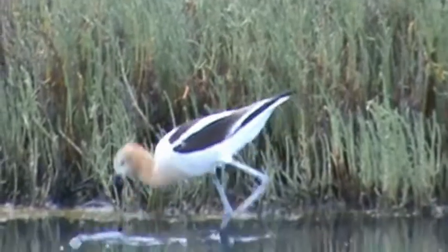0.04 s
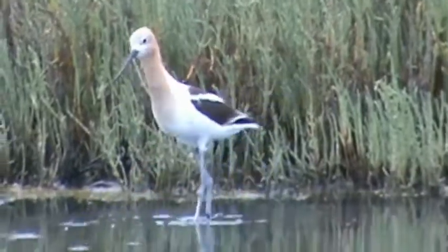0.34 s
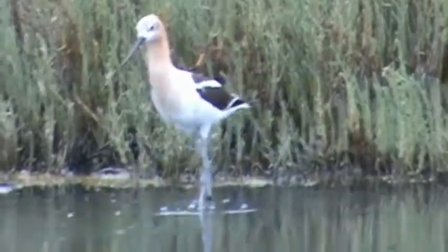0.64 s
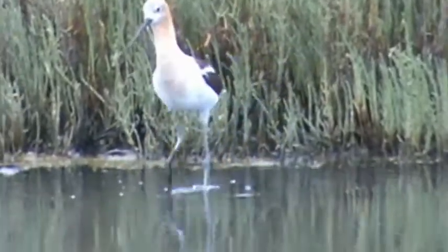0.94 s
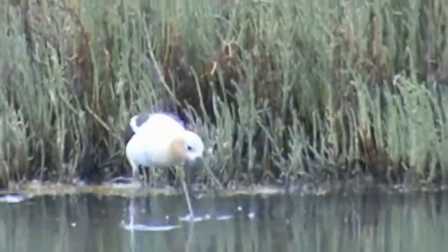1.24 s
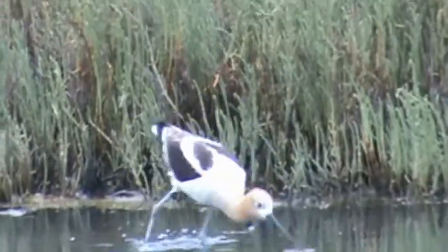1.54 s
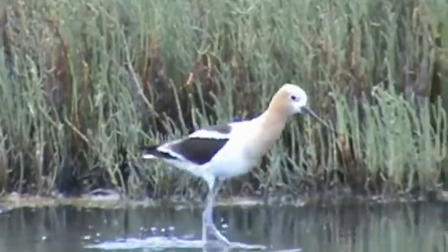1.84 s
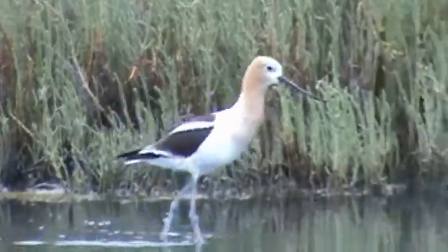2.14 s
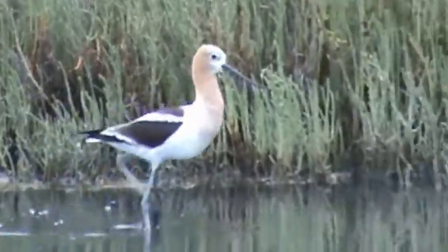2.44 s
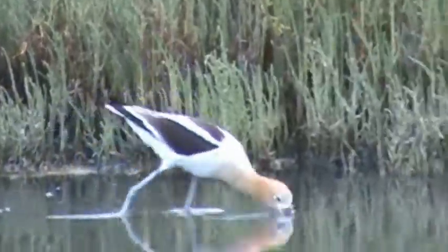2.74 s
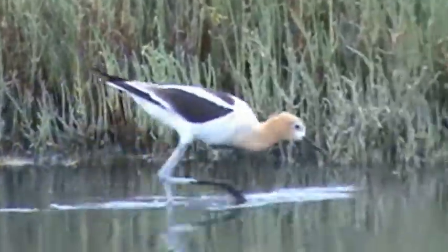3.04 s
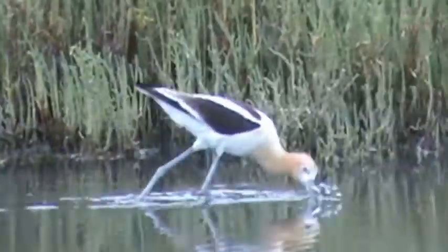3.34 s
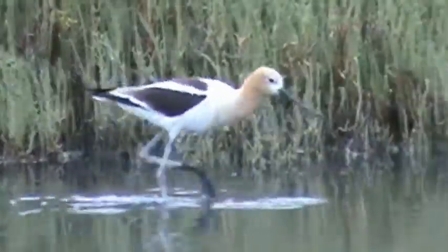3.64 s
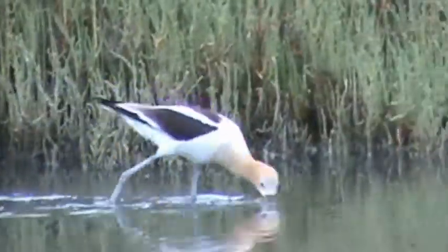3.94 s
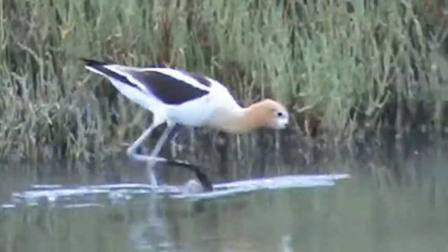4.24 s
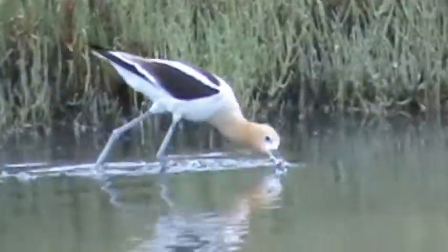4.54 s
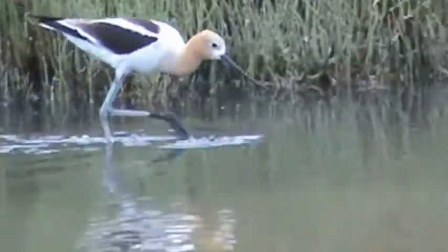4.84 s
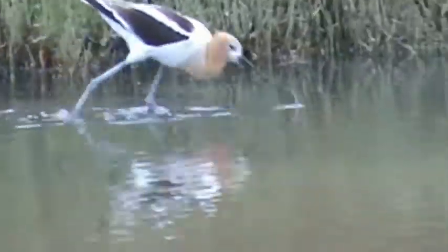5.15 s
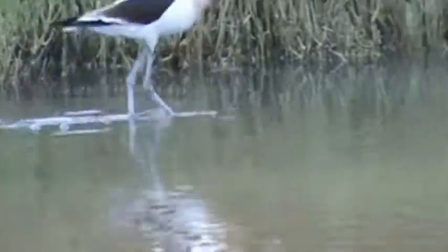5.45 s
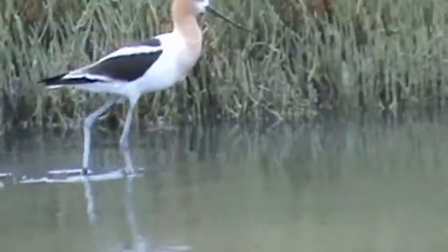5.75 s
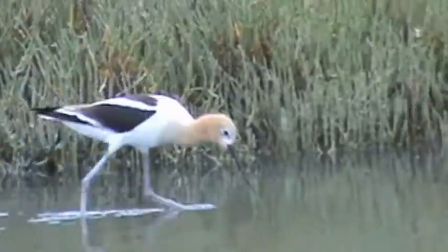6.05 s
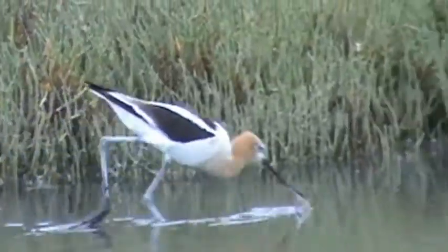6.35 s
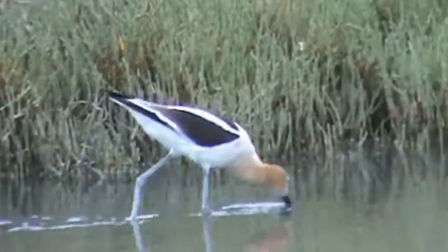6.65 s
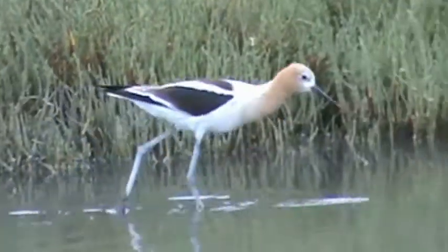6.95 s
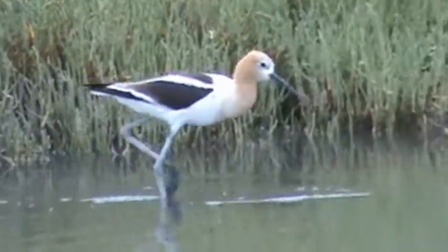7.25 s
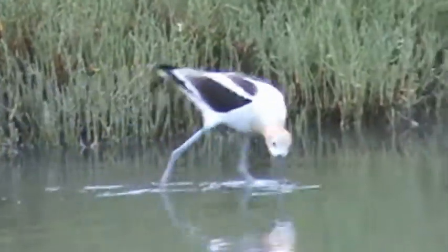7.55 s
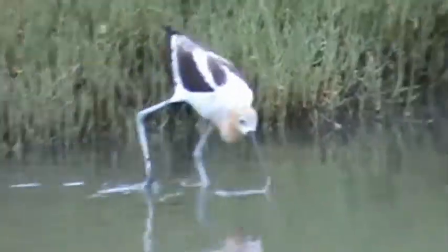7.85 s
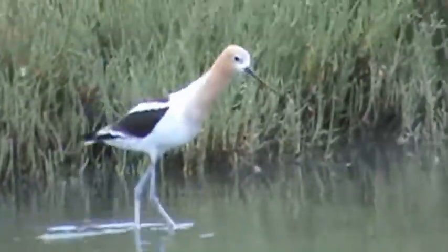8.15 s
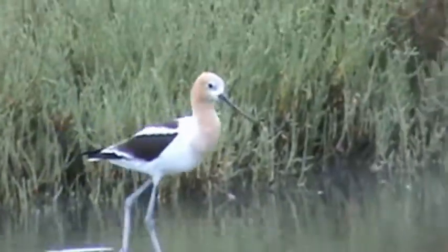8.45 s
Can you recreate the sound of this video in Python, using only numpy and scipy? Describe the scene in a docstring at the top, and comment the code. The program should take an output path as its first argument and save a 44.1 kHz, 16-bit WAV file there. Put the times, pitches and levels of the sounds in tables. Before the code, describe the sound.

Faint, distant birds whistle over a low rumble and soft hiss in an open marsh. Then a nearby wading bird gives five sharp, high calls, each a tiny croak jumping into a loud, falling whistle with a light echo. One sharp click sounds close to the microphone, and three more calls follow, a second bird overlapping one of them. A cricket chirps faintly throughout.

```python
"""Avocets over a shallow marsh

Each call climbs through three registers of the syrinx: a reedy croak, a brief yelp and a loud arched whistle
that falls away. Reeds scatter it and the far bank echoes it. The echo of an earlier call fades at the start,
other birds answer faintly, a cricket chirps in double wing strokes and a few ticks sound close by, over a
distant rumble, a hum and soft hiss. An automatic gain control ducks at the loudest peaks and recovers slowly."""
import sys
import numpy as np
from scipy import signal
from scipy.fft import rfft, irfft, next_fast_len
from scipy.io import wavfile
from scipy.ndimage import uniform_filter1d, minimum_filter1d, map_coordinates

SR = 44100
rng = np.random.default_rng(int(sys.argv[2]) if len(sys.argv) > 2 else 0)


def waveform_to_disk(signal):
    """Save audio, clipped to [-1, 1], as 16-bit WAV at the path in sys.argv[1]."""
    frames = np.transpose(np.atleast_2d(signal))
    scaled = np.clip(frames, -1, 1) * 32767
    samples = np.round(scaled).astype(np.int16)
    wavfile.write(sys.argv[1], SR, samples)


N = 379246

# spectra of the distant rumble and the open-air wash: (frequency [Hz], relative density [dB])
RUMBLE_SPECTRUM = [(12, -35), (20, -16), (38, -3.5), (60, 2), (123, 0), (171, -3.5), (211, -7),
                   (357, -14.5), (400, -17), (520, -40), (880, -120)]
WASH_SPECTRUM = [(150, -15.5), (250, -5.5), (366, -4), (471, -3), (526, -6), (807, 0), (1070, -2),
                 (1590, -2.5), (2120, -7), (2910, -12.5), (3630, -13.5), (3990, -11.5), (5390, -16),
                 (10500, -19.5), (11000, -26), (14300, -72), (22000, -120)]
# envelopes of the rumble, the wash and a far hum: (time [s], relative level [dB])
RUMBLE_ENVELOPE = [(0, -37), (.14, -41), (.26, -34), (.56, -41), (1.4, -40), (2.7, -40.5), (5.9, -41),
                   (7.7, -43), (8.6, -42.5)]
WASH_ENVELOPE = [(0, -47.5), (.5, -46.5), (2.1, -45.5), (4.2, -46.5), (4.9, -45), (5.15, -47.5), (7.2, -46),
                 (7.9, -48), (8.6, -46)]
HUM_ENVELOPE = [(.15, -58), (.35, -46.5), (.65, -41.5), (.95, -49), (1.25, -48.5), (1.5, -58)]
# likeness of the air's noise at left and right: (frequency [Hz], correlation [0-1])
AIR_COHERENCE = [(60, 1), (140, 1), (340, 0.82), (820, 0.76), (1960, 0.64), (4690, 0.81), (11200, 1)]
# swells of high hiss: (middle time [s], duration [s], centre [Hz], bandwidth [Hz], level [dB])
HISS_SWELLS = [(.31, .45, 3940, 1600, -45.5), (3.98, 0.55, 8000, 5000, -45.5),
               (4.862, .5, 4300, 1200, -46.5), (6.499, .55, 7200, 6500, -50), (7.3, .45, 4300, 1400, -46.5)]
# the cricket's runs of chirps: (first chirp [s], last chirp [s], relative level [dB])
CHIRP_RUNS = [(0.402, 1.196, -46), (1.384, 2.263, -45.5), (2.67, 2.866, -46), (3.274, 4.925, -45.5),
              (5.365, 6.388, -45), (6.542, 7.171, -43.5), (7.35, 7.529, -43.5), (8.005, 8.566, -46)]
# distant whistles, the first being the fading echo of an earlier call: (time [s], duration [s], top pitch [Hz],
# relative level [dB])
FAR_WHISTLES = [(.01, 0.18, 3393, -44), (0.578, 0.061, 3540, -45), (0.856, 0.069, 3305, -45),
                (0.859, .06, 4250, -53), (1.157, 0.11, 3250, -49.5), (1.328, 0.041, 3490, -49),
                (1.61, 0.062, 4460, -50), (5.31, 0.067, 3430, -51)]
# small dry ticks: (time [s], relative peak [dB], centre [Hz], bandwidth [Hz])
DRY_TICKS = [(0.024, -32.5, 6970, 3000), (1.375, -35, 8850, 3000), (1.404, -27, 5400, 5000),
             (5.465, -31, 3272, 889)]
# one sharp click: (time [s], relative peak [dB])
SHARP_CLICK = [(4.984, -3.5)]
# spectrum of that click: (frequency [Hz], relative density [dB])
CLICK_SPECTRUM = [(180, -48), (300, -33), (875, -6), (2550, -10.5), (3200, 5.5), (3830, -14), (4390, -3.5),
                  (6200, -6), (6690, -4), (7660, -0.5), (11000, -2.5), (14300, -41), (22000, -120)]
# envelope of the marsh's impulse response: (delay [s], relative level [dB])
ECHO_ENVELOPE = [(.004, 17), (0.032, 0.5), (.07, -6.5), (.14, -21), (.18, -8), (.225, -6.5), (.27, -13.5),
                 (.4, -21), (.6, -35)]
# frequency responses of the marsh and of the bird's throat: (frequency [Hz], gain [dB])
ECHO_RESPONSE = [(700, 9.5), (2500, -1.5), (3300, 1), (5000, 1), (6600, 6.5), (10000, -5)]
THROAT_RESPONSE = [(520, -2.5), (680, 1), (880, -6), (1250, -27), (1700, -5.5), (2400, 5.5), (3800, 2.5),
                   (4700, -11), (5800, -14), (6800, -25.5), (10000, -33)]
# direction of the near calls: (time [s], left minus right [dB])
CALL_BEARING = [(2.5, -2.7), (3.13, -5.3), (4.04, -6.2), (6.1, -3.1), (7.81, -3.9)]
# the croak that opens a call, with levels ahead of the throat:
# (time [s], duration [s], first pitch [Hz], last pitch [Hz], fundamental [dB], overtones [dB])
CROAK_NOTES = [(2.022, 0.047, 505, 571, -41, -35.5), (2.412, 0.021, 580, 619, -39, -25),
               (3.013, 0.069, 520, 670, -38, -42), (3.474, .061, 560, 701, -37, -40),
               (3.938, 0.058, 612, 760, -35, -35), (6.032, .05, 685, 843, -29.5, -29.5),
               (7.263, 0.06, 560, 806, -32.5, -31), (7.729, 0.052, 660, 905, -33.5, -40.5)]
# short held notes on the way up: (time [s], duration [s], pitch [Hz], pitch slope [ratio], level [dB],
# level slope [dB], octave [dB re tone], third harmonic [dB re tone], growl [0-1])
YELP_NOTES = [(2.058, 0.017, 2770, 0.037, -4.5, 0, -29.5, -30.5, 0.02),
              (2.424, .011, 2285, .01, -13.5, -1, -9.5, -26, 0.12),
              (2.433, .031, 3185, .012, -2.8, -4, -22.5, -20.5, .02),
              (6.063, .019, 2520, 0.024, -14.5, 2, -5.5, -32, 0.16),
              (7.306, 0.021, 2414, 0.061, -16, -5.5, -6, -21.5, 0.09),
              (7.775, 0.024, 2650, -0.031, -16, -2, -19.5, -35, 0.04)]
# arched whistles; two birds overlap at 7.32 s: (time [s], duration [s], pitch [Hz], pitch slope [ratio],
# final fall [ratio], level [dB], level slope [dB], octave [dB re tone], third harmonic [dB re tone])
WHISTLE_NOTES = [(2.079, 0.057, 3420, -0.0052, 0.19, -6, 2, -17, -23),
                 (2.463, .033, 3705, -0.084, 0.36, -3, -5.5, -14, -38),
                 (3.081, 0.097, 3128, -.008, .19, -11.5, 4, -15.5, -35),
                 (3.534, .092, 3182, -0.018, .155, -13.5, 6.5, -13.5, -37),
                 (3.997, 0.086, 3292, -0.024, 0.17, -9, 4.5, -13.5, -34.5),
                 (6.082, 0.058, 3314, -0.15, 0.12, -6.5, 1.5, -14.5, -34.5),
                 (7.323, 0.11, 3211, -.03, 0.12, -13, 3.5, -21.5, -36),
                 (7.326, 0.047, 3464, -.04, 0.16, -8.5, 2, -13.5, -32),
                 (7.798, 0.059, 3285, -.19, 0.1, -14.5, 0, -11, -43)]


def amp(db):
    """Amplitude ratio: tenfold for every 20 dB."""
    return 10 ** (np.asarray(db) / 20)


def unit_rms(x):
    """Normalisation to a mean power of 1."""
    return x / np.sqrt(np.mean(x ** 2) + 1e-20)


def at_frequency(points, hz):
    """Interpolation of (frequency, value) points on a logarithmic axis."""
    knots_hz, values = np.transpose(points)
    return np.interp(np.log(hz + 1), np.log(knots_hz + 1), values)


def envelope(points):
    """Linear interpolation of (time, value) points at every sample."""
    return np.interp(np.arange(N) / SR, *np.transpose(points))


def wobble(rate, size=N):
    """Smooth random modulation: a spline through rate knots a second."""
    knots = rng.standard_normal(int(size * rate / SR) + 4)
    return map_coordinates(knots, [np.arange(size) * rate / SR])


def filtered(x, response):
    """Linear filtering: the spectrum is multiplied by a frequency response."""
    size = next_fast_len(x.shape[-1] + SR // 4)
    return irfft(rfft(x, size) * response(np.fft.rfftfreq(size, 1 / SR)), size)[..., :x.shape[-1]]


def add(track, start, sound):
    """Superposition of a sound on the track from start seconds."""
    part = track[max(round(start * SR), 0):][:len(sound)]
    part += sound[:len(part)]


def panned(x, left_db):
    """Direction by level difference: the left exceeds the right by left_db."""
    gains = amp(np.array([[.5], [-.5]]) * left_db)
    return x * gains / gains.mean(axis=0)


def note_window(length, fade):
    """Raised-cosine gating: returns time, the fraction u of the note gone by, and the gate."""
    t = np.arange(int((length + 2 * fade) * SR)) / SR - fade
    gate = np.sin(np.pi / 2 * np.clip(.5 + np.minimum(t, length - t) / fade, 0, 1)) ** 2
    return t + fade, np.clip(t / length, 0, 1), gate


def diffuse_noise(spectrum, patchy_db):
    """Partly coherent stereo noise: the balance of mid and side sets the correlation."""
    cells = signal.stft(rng.standard_normal((2, N)), nperseg=512)[2]
    # the gain varies in patches of frequency and time
    patches = uniform_filter1d(rng.standard_normal(cells.shape[1:]), size=6, axis=0)
    patches = uniform_filter1d(patches, size=16, axis=1)
    pair = signal.istft(cells * amp(patchy_db * unit_rms(patches)), nperseg=512)[1][:, :N]

    def mid_side(hz):
        angle = np.arccos(np.clip(at_frequency(AIR_COHERENCE, hz), -1, .98)) / 2
        return amp(at_frequency(spectrum, hz)) * [np.cos(angle), np.sin(angle)]

    mid, side = filtered(pair, mid_side)
    return unit_rms(np.array([mid + side, mid - side]))


def open_air(hum_hz):
    """Ambient sound: a low rumble and a broad wash superpose on a far hum that swells and fades."""
    rumble = amp(envelope(RUMBLE_ENVELOPE) + 0.5) * diffuse_noise(RUMBLE_SPECTRUM, patchy_db=0.68)
    wash = amp(envelope(WASH_ENVELOPE) + 6) * diffuse_noise(WASH_SPECTRUM, patchy_db=1.7)
    phase = 2 * np.pi * np.cumsum(hum_hz * (1 + 0.0025 * wobble(13))) / SR
    hum = amp(envelope(HUM_ENVELOPE) + 1.2 * wobble(7.5)) * np.sin(phase)
    return rumble + panned(wash, left_db=0.9) + hum


def hiss_swells():
    """Band-pass noise swells and fades under a half-sine envelope."""
    track = np.zeros(N)
    for middle, length, hz, width, db in HISS_SWELLS:
        u = np.linspace(0, 1, int(length * SR))
        hiss = filtered(rng.standard_normal(len(u)), lambda f: 1 / (1 + (2 * (f - hz) / width) ** 4))
        add(track, middle - length / 2, amp(db) * np.sin(np.pi * u) * unit_rms(hiss))
    return track


def cricket(start_hz, end_hz, stroke_s, spacing_s, period_s, first_db, gain_db):
    """Stridulation: two wing strokes make a chirp, and the tone sinks as each stroke slows."""
    track = np.zeros(N)
    u = np.linspace(0, 1, int(stroke_s * SR))
    for first, last, db in CHIRP_RUNS:
        count = round((last - first) / period_s) + 1
        for start in np.linspace(first, last, count) - stroke_s / 2:
            detune, accent_db = rng.standard_normal(2)
            hz = (start_hz + (end_hz - start_hz) * u ** 2) * (1 + 0.0025 * detune)
            pulse = amp(db + gain_db) * np.sin(np.pi * u) * np.sin(2 * np.pi * np.cumsum(hz) / SR)
            add(track, start, amp(first_db + accent_db) * pulse)
            add(track, start + spacing_s, pulse)
    return track


def far_birds(droop, waver, flutter):
    """Multipath fading: distant arched whistles flutter as they scatter through the reeds."""
    track = np.zeros(N)
    for start, length, hz, db in FAR_WHISTLES:
        u = np.linspace(0, 1, int(length * SR))
        pitch = hz * (1 - droop * (u - .35) ** 2 + waver * wobble(488, len(u)))
        phase = 2 * np.pi * np.cumsum(pitch) / SR
        tone = np.sin(phase) + amp(-17) * np.sin(2 * phase)
        add(track, start, amp(db) * np.sqrt(abs(np.sin(np.pi * u))) * tone)
    return track * (1 + flutter * wobble(450))


def snap(response, t60):
    """Exponential decay: coloured noise of peak 1 loses 60 dB in t60 seconds."""
    t = np.arange(SR // 20) / SR
    burst = filtered(rng.standard_normal(len(t)), response) * amp(-60 * t / t60)
    return burst / abs(burst).max()


def ticks():
    """Damped transients: faint ticks, each around one frequency, and a sharp broadband click."""
    track = np.zeros(N)
    for start, db, hz, width in DRY_TICKS:
        add(track, start, amp(db) * snap(lambda f: 1 / (1 + (2 * (f - hz) / width) ** 2), t60=0.028))
    for start, db in SHARP_CLICK:
        add(track, start, amp(db + 0.5) * snap(lambda f: amp(at_frequency(CLICK_SPECTRUM, f)), t60=0.013))
    return track


def marsh_echo(x):
    """Scattering and reflection: reeds answer at once, the far bank a fifth of a second later."""
    t = np.arange(int(.6 * SR)) / SR
    delay, db = np.transpose(ECHO_ENVELOPE)
    shared, left, right = rng.standard_normal((3, len(t))) * amp(np.interp(t, delay, db, left=-120))
    tail = shared + 0.43 * np.array([left, right])
    tail = filtered(tail / np.linalg.norm(tail[0]), lambda hz: amp(at_frequency(ECHO_RESPONSE, hz)))
    return signal.fftconvolve(x[None], tail, axes=1)[:, :N]


def croaks(bend_power, jitter, shimmer_db, dispersion, rasp_db, attack_s, attack_db, fade_s):
    """Source and filter: in the low register the throat shapes rising harmonics and a pulsing rasp."""
    track = np.zeros(N)
    harmonic = np.arange(1, 13)[:, None]
    for start, length, first_hz, last_hz, fundamental_db, buzz_db in CROAK_NOTES:
        t, u, gate = note_window(length, fade_s)
        hz = (first_hz + (last_hz - first_hz) * u ** bend_power) * (1 + jitter * wobble(600, len(t)))
        phase = 2 * np.pi * np.cumsum(hz) / SR
        source_db = np.where(harmonic == 1, fundamental_db, buzz_db)
        gains = np.sqrt(2) * amp(source_db + at_frequency(THROAT_RESPONSE, harmonic * hz))
        # the throat delays each harmonic differently, which spreads the pulse
        voice = (gains * np.cos(harmonic * phase - dispersion * harmonic ** 2)).sum(axis=0)
        noise = rng.standard_normal(len(t))
        hiss = unit_rms(filtered(noise, lambda f: amp(at_frequency(THROAT_RESPONSE, f)) * f / (f + 3000)))
        rasp = amp(buzz_db + rasp_db) * hiss * (1 + np.cos(phase))  # turbulence escapes once a cycle
        swell = amp(shimmer_db * wobble(501, len(t)) - attack_db * np.exp(-u * length / attack_s))
        add(track, start - fade_s, gate * swell * (voice + rasp))
    return track


def syrinx(t, hz, db, octave_db, third_db, growl=0, jitter=0.0032, shimmer_db=.5, rasp_db=-19):
    """Self-sustained oscillation: a tone with two overtones, modulated by growl at a third of its pitch."""
    size = len(t)
    phase = 2 * np.pi * np.cumsum(hz * (1 + jitter * wobble(500, size))) / SR
    tone = np.sin(phase) + amp(octave_db) * np.sin(2 * phase) + amp(third_db) * np.sin(3 * phase)
    tone *= 1 + growl * np.cos(phase / 3)
    # the vibration is rough until it locks in, with a noisy band halfway to the octave
    roughness = amp(rasp_db) * (.06 + np.exp(-t / .012))
    rasp = wobble(1500, size) * np.sin(phase) + .5 * wobble(2000, size) * np.sin(1.5 * phase)
    return np.sqrt(2) * amp(db + shimmer_db * wobble(220, size)) * (tone + roughness * rasp)


def yelps(fade_s):
    """Register breaks: the voice lingers near one middle pitch before it jumps again."""
    track = np.zeros(N)
    for start, length, hz, slope, db, slope_db, octave_db, third_db, growl in YELP_NOTES:
        t, u, gate = note_window(length, fade_s)
        pitch = hz * (1 + slope * (u - .5))
        level = db + slope_db * (u - .5)
        add(track, start - fade_s, gate * syrinx(t, pitch, level, octave_db, third_db, growl))
    return track


def whistles(arch, fall_power, release_db, release_power, octave_dip_db, fade_s):
    """Frequency modulation: the high register traces a tilted arch, then pitch and level drop together."""
    track = np.zeros(N)
    for start, length, hz, slope, fall, db, slope_db, octave_db, third_db in WHISTLE_NOTES:
        t, u, gate = note_window(length, fade_s)
        edge = (2 * u - 1) ** 2  # 0 in mid-whistle, 1 at both ends
        pitch = hz * (1 + slope * (u - .5) - arch * edge - fall * u ** fall_power)
        level = db + slope_db * (u - .5) - release_db * u ** release_power
        tone = syrinx(t, pitch, level, octave_db - octave_dip_db * edge, third_db)
        add(track, start - fade_s, gate * tone)
    return track


def scene():
    """Superposition: direct sound from the right, the birds' echoes and the open air."""
    near = croaks(bend_power=.68, jitter=.011, shimmer_db=1.8, dispersion=0.328, rasp_db=-11,
                  attack_s=0.01, attack_db=13.5, fade_s=.006)
    near += yelps(fade_s=.005)
    near += whistles(arch=0.034, fall_power=11.5, release_db=17, release_power=7.2,
                     octave_dip_db=5, fade_s=.005)
    far = far_birds(droop=.25, waver=.03, flutter=0.76)
    chirps = cricket(start_hz=4100, end_hz=3945, stroke_s=.019, spacing_s=.034, period_s=.175,
                     first_db=-2.5, gain_db=4)
    direct = panned(near, envelope(CALL_BEARING)) + panned(far + chirps, left_db=-7)
    direct += panned(ticks(), left_db=-3)
    echoes = panned(amp(-18) * marsh_echo(near), left_db=-3) + amp(-4) * marsh_echo(far)
    return direct + echoes + hiss_swells() + open_air(hum_hz=401)


def record(dry):
    """Automatic gain control ducks quickly at a loud peak and creeps back; a low-pass limits the band."""
    ceiling, recovery_db_per_s, cutoff_hz = .95, 3.6, 11220
    excess_db = 20 * np.log10(np.maximum(abs(dry).max(axis=0) / ceiling, 1))
    recovered_db = recovery_db_per_s * np.arange(N) / SR
    reduction_db = np.maximum.accumulate(excess_db + recovered_db) - recovered_db
    gain = uniform_filter1d(minimum_filter1d(amp(-reduction_db), size=120), size=120)
    return filtered(dry * gain, lambda hz: hz < cutoff_hz)


dry = scene()
out = record(dry)
waveform_to_disk(out)
```